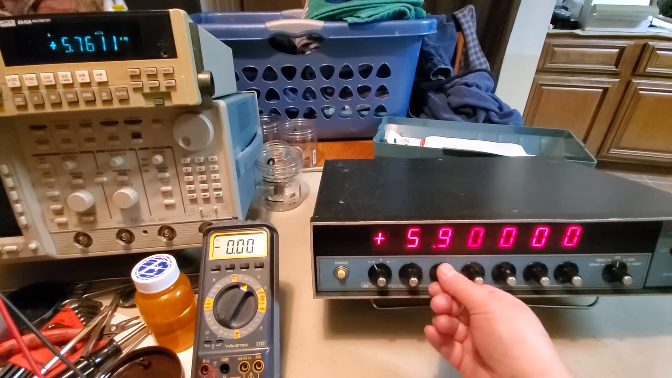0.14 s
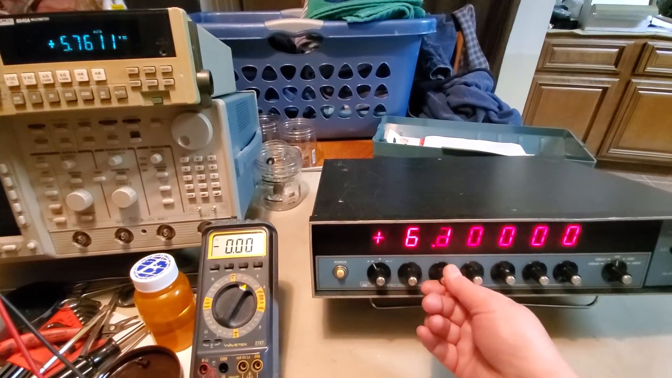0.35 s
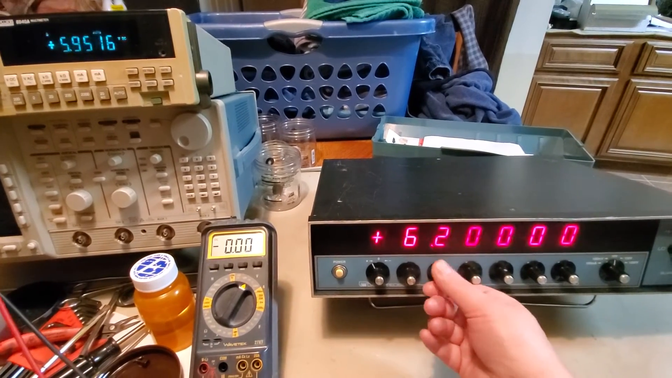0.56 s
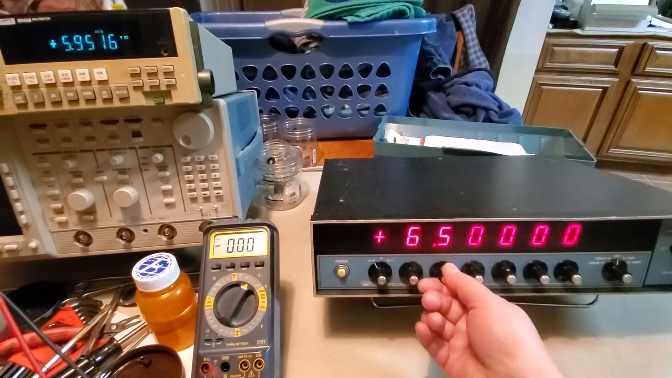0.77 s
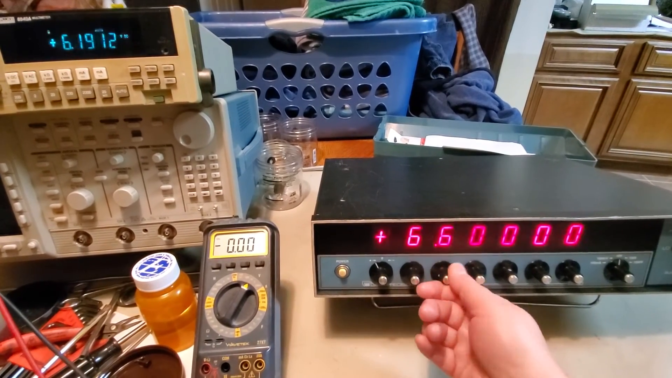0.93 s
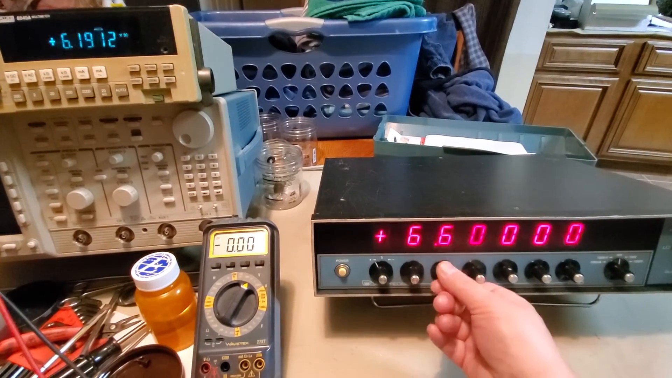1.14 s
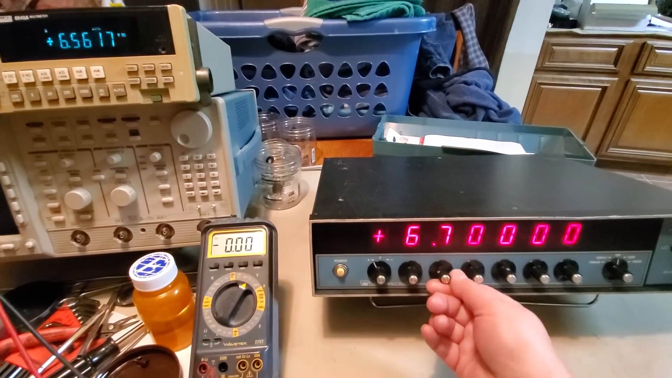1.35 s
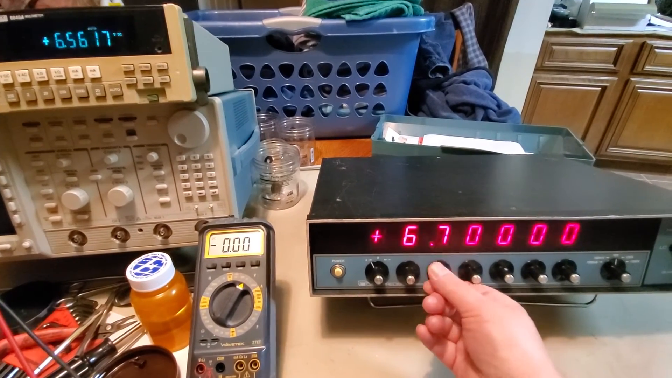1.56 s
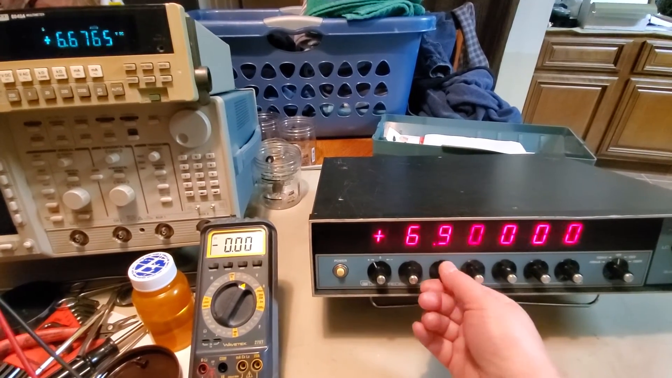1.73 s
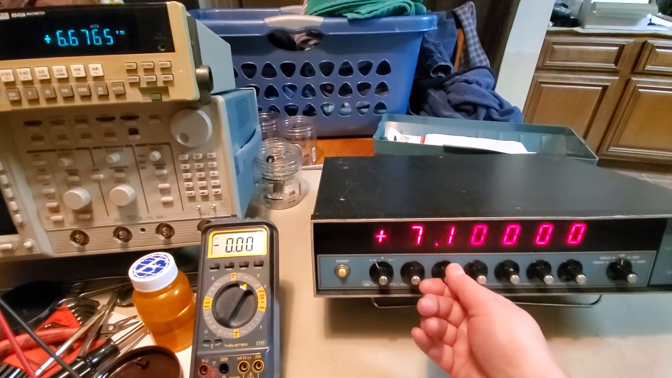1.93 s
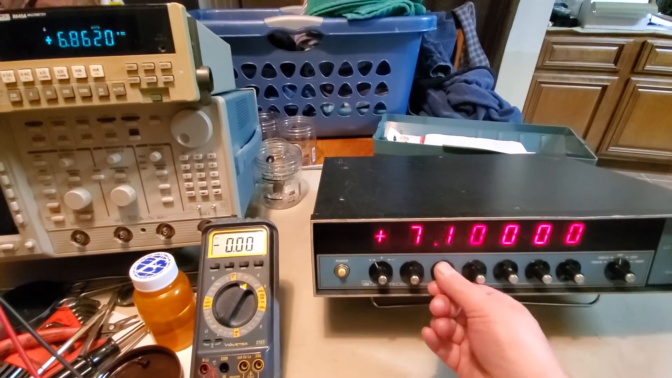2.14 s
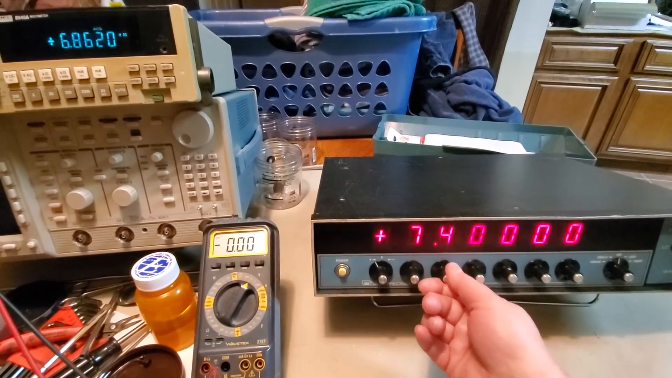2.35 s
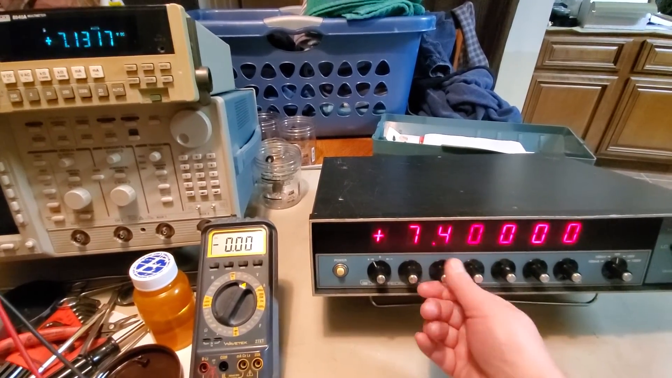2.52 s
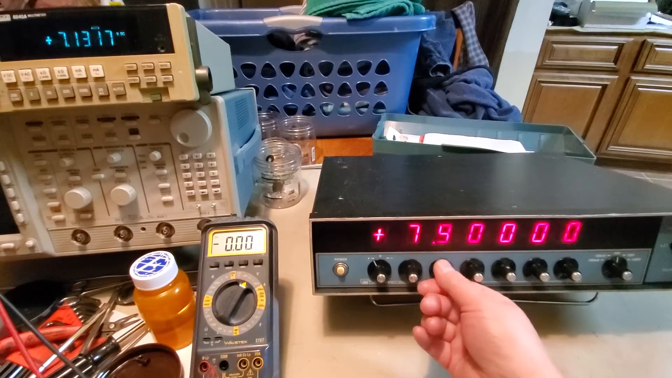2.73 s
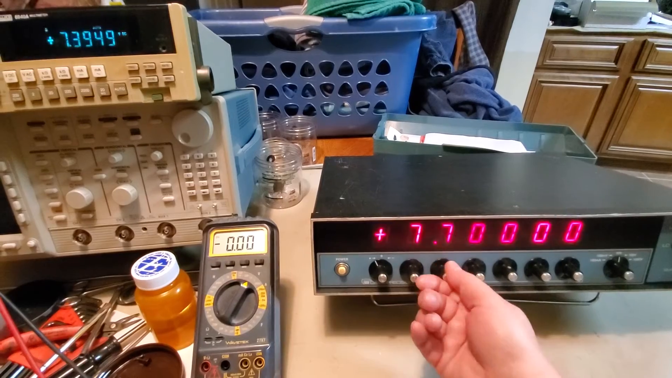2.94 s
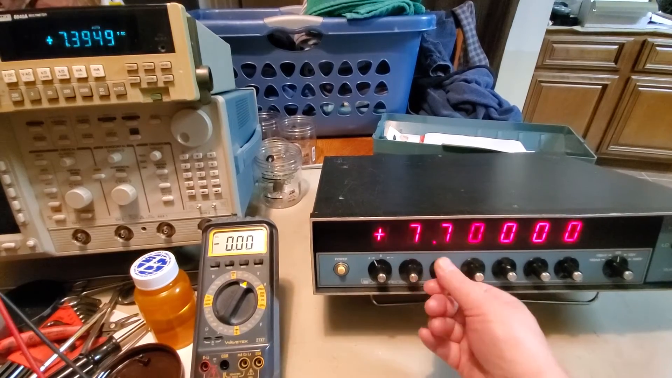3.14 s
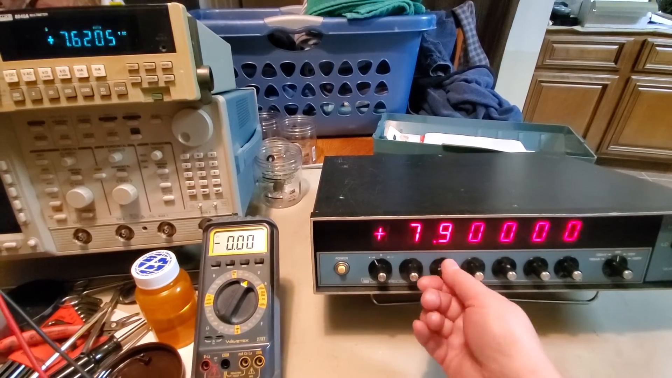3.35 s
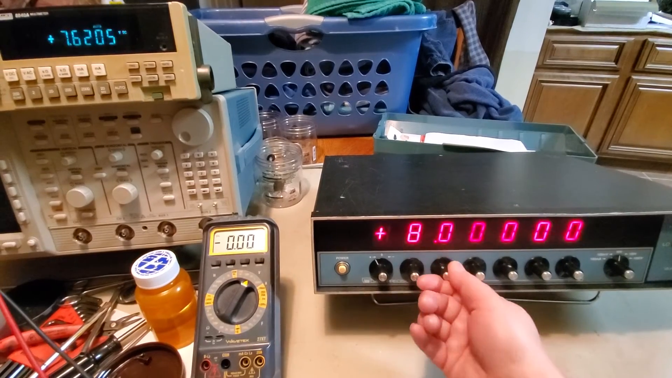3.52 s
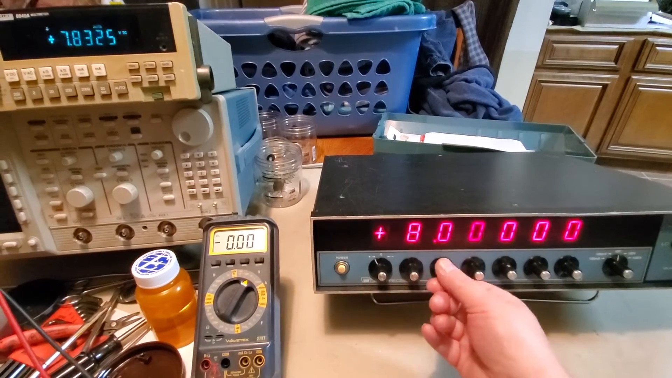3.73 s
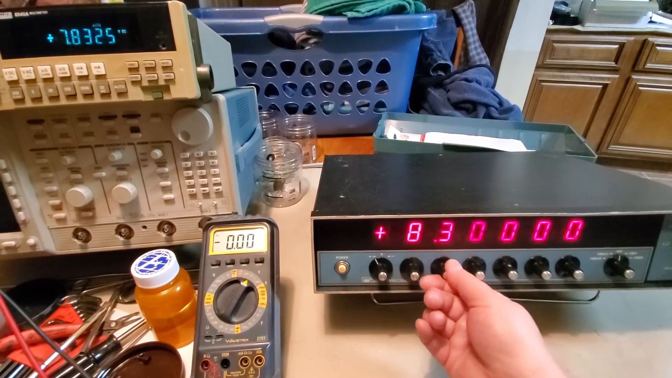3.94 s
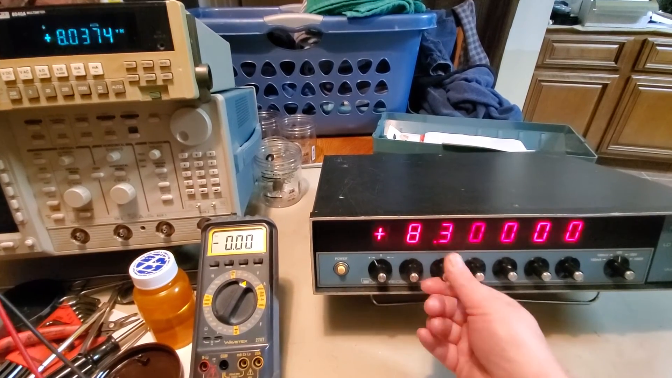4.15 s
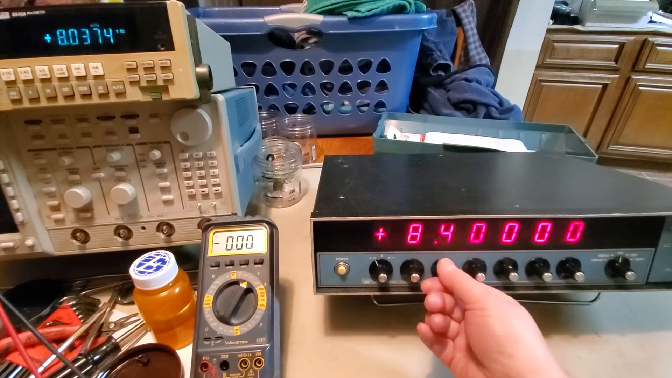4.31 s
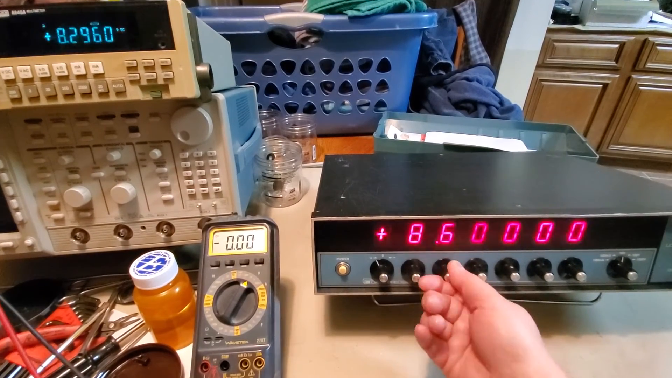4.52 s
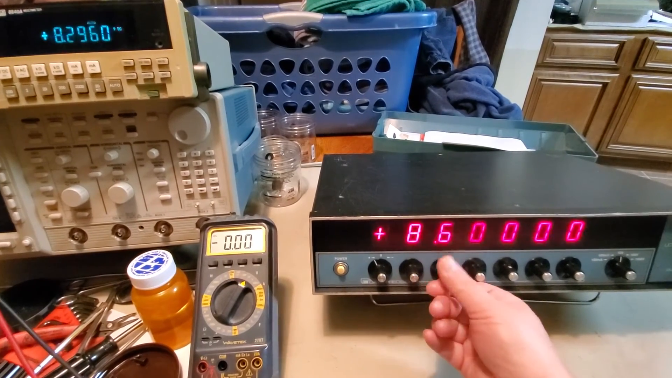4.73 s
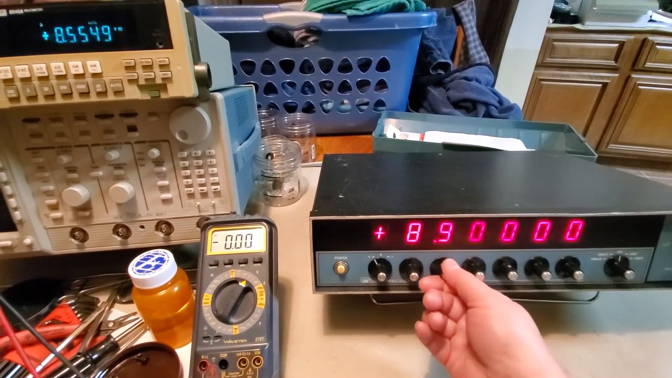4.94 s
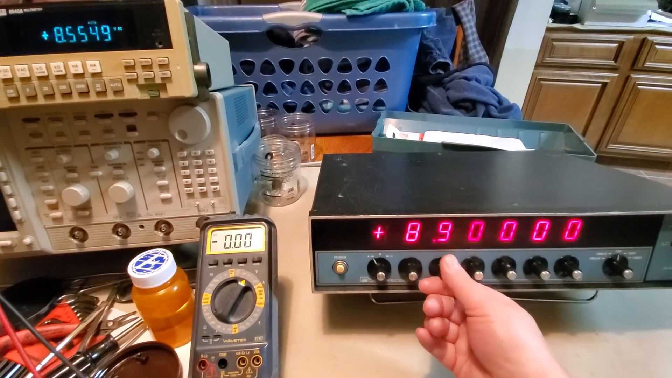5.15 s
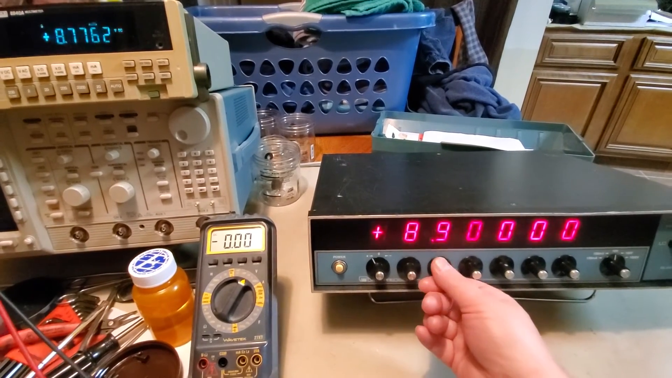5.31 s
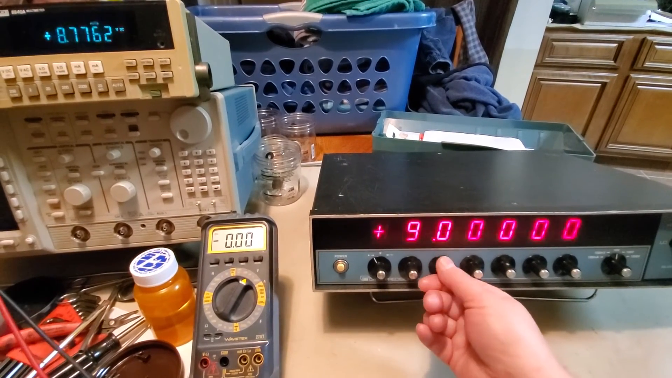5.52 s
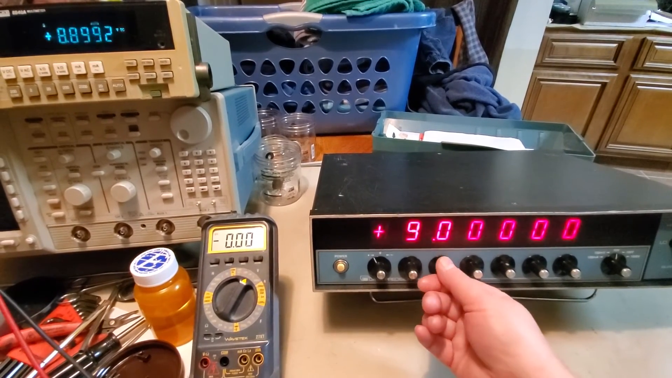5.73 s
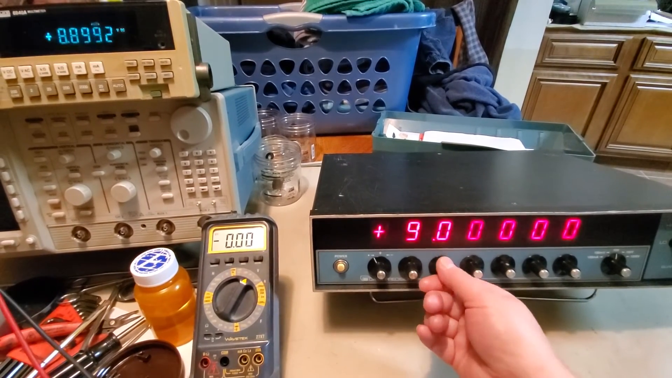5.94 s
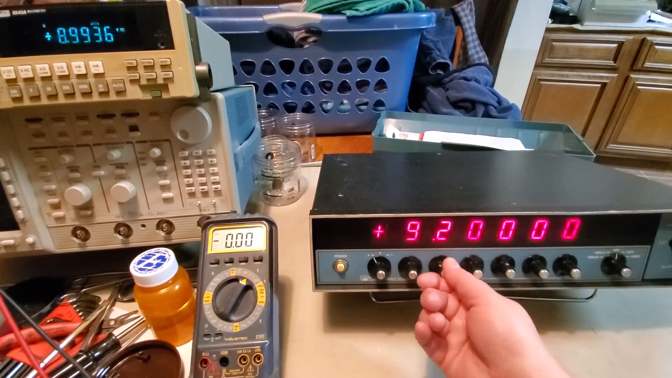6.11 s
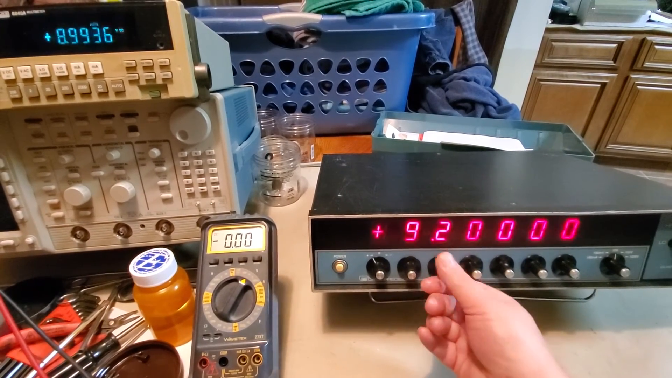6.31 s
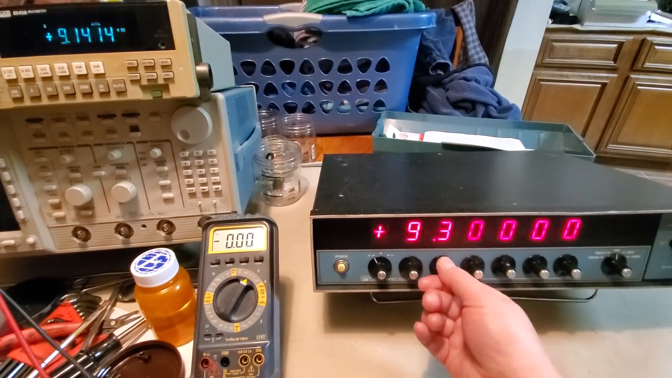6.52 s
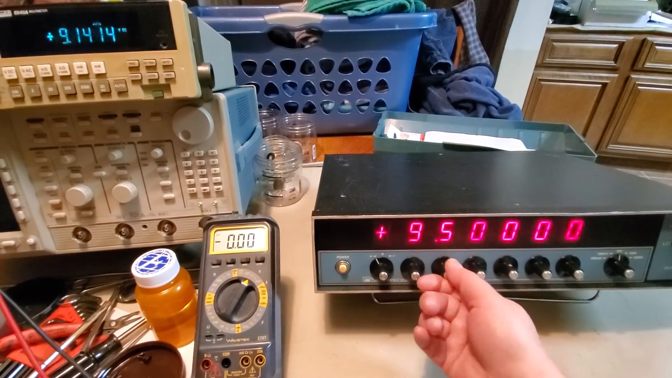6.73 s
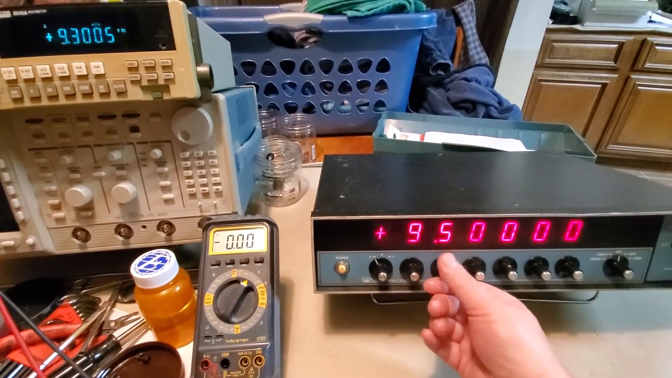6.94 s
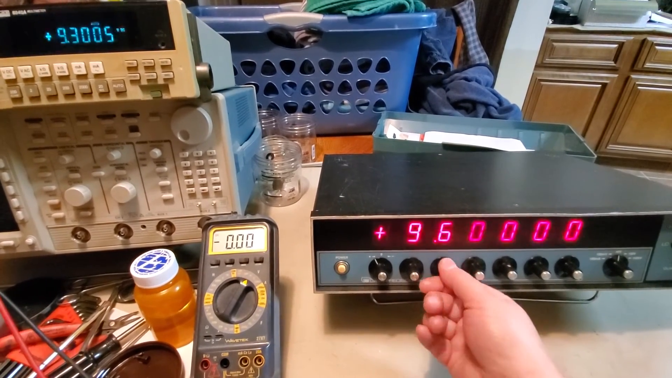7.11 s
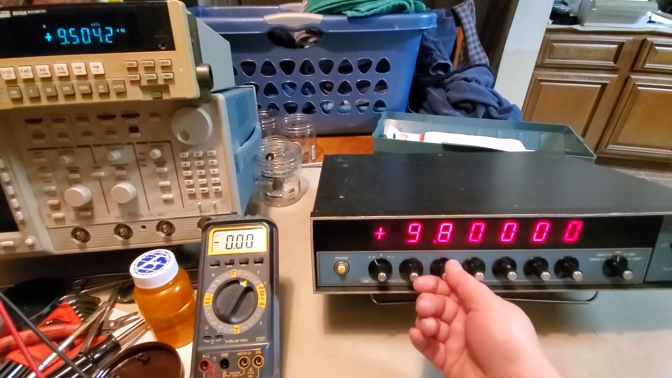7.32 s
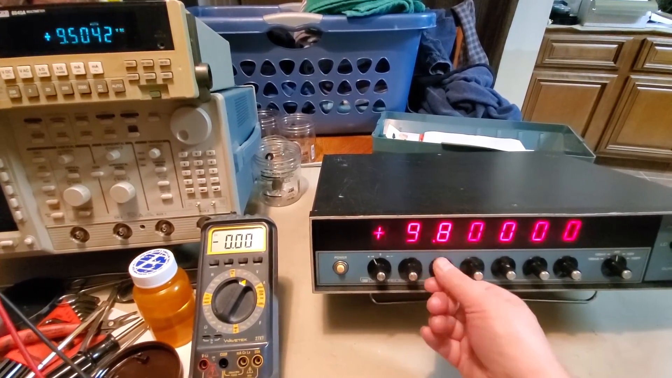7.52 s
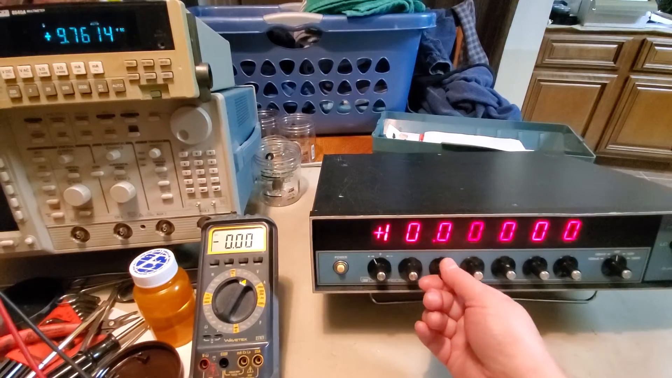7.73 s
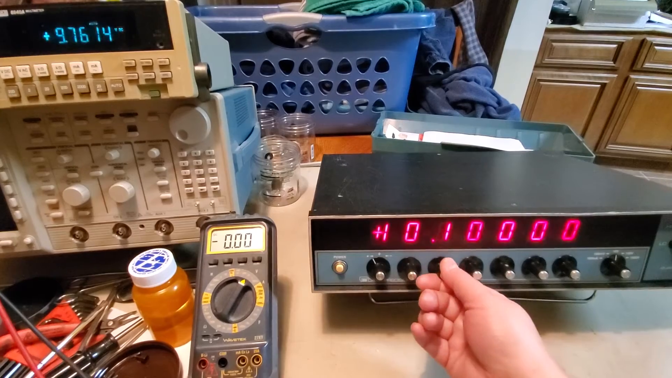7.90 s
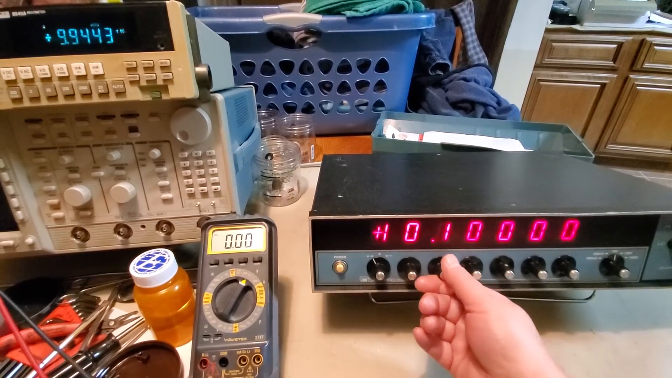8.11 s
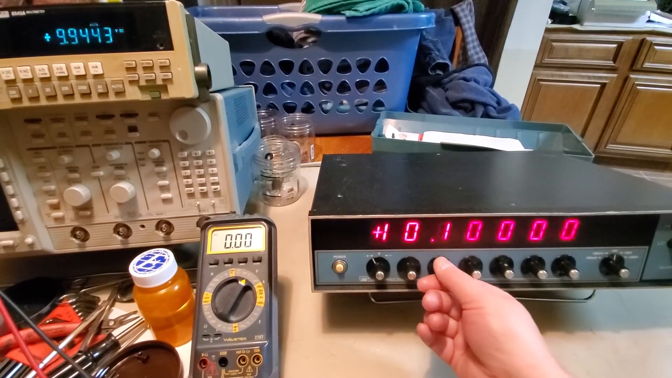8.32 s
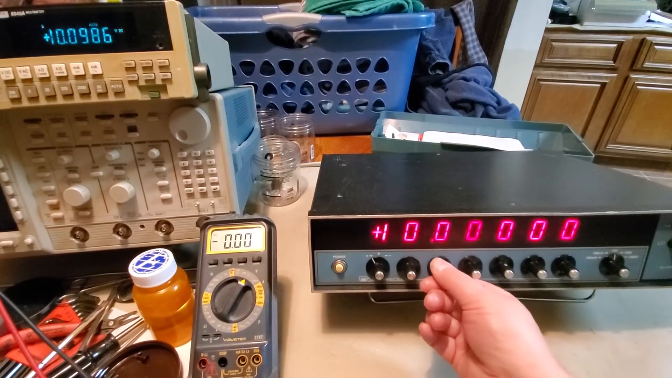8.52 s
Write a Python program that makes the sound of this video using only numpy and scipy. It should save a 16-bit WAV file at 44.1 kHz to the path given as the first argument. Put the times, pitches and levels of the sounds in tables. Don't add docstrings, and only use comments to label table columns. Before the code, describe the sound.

A detented knob is twisted in short bursts of two or three crisp metallic clicks, with faint finger rubbing between, over low wavering household hum.

```python
import sys
import numpy as np
from scipy import signal
from scipy.fft import rfft, irfft, next_fast_len
from scipy.io import wavfile
from scipy.ndimage import map_coordinates

SR = 44100
rng = np.random.default_rng(int(sys.argv[2]) if len(sys.argv) > 2 else 0)


def to_wav(s):
    ch = np.atleast_2d(s).T
    pcm = np.round(np.clip(ch, -1, 1) * 32767)
    wavfile.write(sys.argv[1], SR, pcm.astype(np.int16))


def voltage_ratio(decibels):
    exponent = np.asarray(decibels, float) / 20
    return 10 ** exponent


N = 377580

# start_s, peak_db, low_modes_db, high_modes_db,
# spring_pitch_hz
SNAPS = [(0.2335, -16, -15, -17.5, 5470), (0.3051, -16, -16.5, -17.5, 5400),
         (0.4507, -15.5, -13.5, -15.5, 6300), (0.7405, -16.5, -14, -15, 5800),
         (0.7701, -14, -15, -16, 5740), (0.7994, -12.5, -17.5, -17.5, 3950),
         (0.891, -16.5, -18, -17.5, 6300), (1.258, -15, -15.5, -20, 5600),
         (1.721, -18.5, -12, -18, 5660), (1.7676, -16, -13.5, -16, 5700),
         (1.828, -15.5, -18, -17.5, 5400), (2.243, -15.5, -18.5, -20, 5310),
         (2.2906, -9.5, -16.5, -16.5, 4460), (2.3235, -12, -15.5, -17, 6250),
         (2.3927, -16.5, -17.5, -17.5, 6000), (2.8041, -11, -18.5, -19.5, 6160),
         (2.8749, -15.5, -19.5, -18.5, 4997), (2.9561, -17, -19, -17, 5140),
         (3.3396, -11.5, -14, -19, 6050), (3.3817, -15.5, -11.5, -16, 5240),
         (3.465, -19.5, -18, -17, 4100),
         (3.876, -13.5, -15.5, -21, 4694), (3.917, -14, -19.5, -18, 5340),
              (3.985, -17, -16.5, -17, 5470), (4.3867, -18.5, -14, -14, 4090),
              (4.4225, -15, -16.5, -18, 5730), (4.4799, -17, -16.5, -18, 6400),
              (4.897, -17, -14.5, -18, 5810), (4.931, -14.5, -18.5, -17.5, 6790),
              (4.9763, -15, -18, -18, 5270), (5.596, -15.5, -19.5, -19, 6260),
              (6.037, -19.5, -18.5, -19.5, 5900), (6.1541, -20, -21.5, -20, 4700),
              (6.571, -16, -13.5, -16.5, 4850), (6.6219, -16, -16, -17.5, 5300),
              (6.724, -17, -18, -16.5, 5200), (7.1512, -14.5, -16.5, -17.5, 4570),
              (7.2059, -17.5, -16.5, -16.5, 5510), (7.2928, -17, -15.5, -17, 5180),
              (7.7037, -15, -13, -18, 6540), (7.7663, -12.5, -19.5, -17, 4900),
              (7.8824, -17.5, -22, -20, 6660), (8.5555, -22, -14, -19, 5100)]
# delay_ms, strength_db, ring_length_ratio
BOUNCES = [(5.4, 3, 0.52), (7.3, -5.5, 0.68), (12, -6.5, 0.65), (6, -6, .9), (5.3, -7, 1), (3.9, -3, 0.77),
           (2, 2, 0.67), (3, -2, 0.69), (6, -9.5, 0.83), (3.5, -5.5, .9), (1.9, 0.5, .8), (9.5, -1.5, .9),
           (2, -5, .9), (4.5, -1, 0.61), (1.9, 0.5, 0.66), (5, -4, 0.54), (4.41, -2.5, 0.65),
           (1.3, 2, 0.98), (1.5, -5.5, 1), (14, -6, 0.73), (3.1, -0.5, 1), (3.5, 5.5, 0.56),
           (2.7, 0.5, 0.78), (4.9, -3, 0.81), (4.3, 0.5, 1), (4.9, -4, 0.96), (2.6, 2, 0.88), (5, -2.5, .9),
           (2.9, -1.5, 1), (4.3, -7, 0.77), (2.9, -9, 0.67), (4.35, 0.5, 0.58), (2.81, -7.5, 1),
           (6.1, -1, 0.66), (7.1, -1.5, 0.6), (2.9, -1, 0.88), (7.7, -8.5, 0.97), (2.3, -5.5, 0.9),
           (5.7, 1, 0.57), (6.2, -8.5, 0.82), (4.9, -5.5, 0.85), (4.1, 1, 0.76), (3, -5.5, 0.74)]
# delay_ms, strength_db
SOFT_BOUNCE = (3.1, -6)
# start_s, peak_db, low_modes_db, high_modes_db
TAPS = [(0.711, -37, -4, -27), (0.9844, -58, 4.5, 0), (1.1998, -42, 7, -20), (1.316, -35, 2, -13),
        (1.3283, -33, -4, -15), (1.3372, -31, -13, -31), (2.7262, -52.5, 2, -27), (2.7674, -36.5, -2, -28),
        (3.3022, -56, 12, -6), (3.8137, -42, -1, -7), (4.879, -68, 14, -23), (5.111, -63, 8, -14),
        (5.155, -47.5, -0.5, -24), (5.5055, -57, -2, -2), (5.998, -43, -5, -26), (6.133, -55, -12, -4),
        (6.459, -63.5, -12, 3), (6.4809, -61, 9, -29), (6.4939, -58.5, 17, -6.5), (6.5198, -39.5, -2, -21),
        (7.0983, -44.5, 4.5, -21), (7.646, -55.5, -3, -24), (7.6594, -39, -5.5, -31)]
# start_s, peak_db, low_modes_db, high_modes_db
TICKS = [(0.179, -52, 10, 3), (0.198, -53, 4.5, 0.5), (0.21, -39.5, 2.5, -6.5), (0.3894, -42, -9, -20),
         (0.398, -36, -36, -7), (0.4114, -52, 5.5, -9), (0.4224, -63.5, 8, 17), (0.9291, -44, -6, -14),
         (1.219, -29, -3, -25), (1.941, -41, -29, -5), (1.9795, -37.5, -5, -10), (3.505, -53.5, -22, -4.5),
         (3.5164, -40, -17, -8.5), (1.355, -39, -8, -5), (1.374, -50, -15, -1), (1.449, -50, -15, -8),
         (1.4615, -45.5, -17, -2), (3.8142, -40, -4, -3), (3.3296, -39, -13.5, -23),
         (5.3946, -61, -14.5, -3), (5.441, -56, -12, -5), (5.451, -45, -6, -10), (5.4789, -53, -15, -6),
         (5.4908, -52, -15, -4), (5.52, -56, -9, -19), (7.9892, -50, 3, -16), (8.329, -48, 6, -22.5)]
# firmest_grip_s, rub_swell_db, hiss_swell_db, bench_thump_db
TWISTS = [(.3, 11, 13, 2.5), (.88, 8, 8.5, 5.5), (1.38, 7.5, 7.5, 8), (1.88, 9.5, 7.5, 2.5),
          (2.379, 11.5, 9, 6.5), (2.91, 10, 12, 3), (3.48, 10, 10, 5), (4.0, 9, 11, -2),
          (4.527, 8.5, 9, 14.5), (5.051, 9.5, 6, 7.5), (5.5, 2.5, 3.5, -2), (6.15, 7, 9, 3),
          (6.66, 10, 14, -3.5), (7.28, 9, 14.5, 5), (7.82, 4.5, 12, 1)]
# mode_hz, level_db
CASE_MODES = [(1420, -22), (1820, -19), (2020, -15), (2400, -12), (2730, -12), (2960, -11), (3890, -8),
              (4810, -7), (4930, -6), (5310, -6), (5620, -4), (5910, -5), (6300, -8)]
# freq_hz, density_db_per_hz
SNAP_COLOUR = [(240, -49.5), (400, -27.5), (598, -29), (879, -31), (1630, -21.5), (2430, -13.5),
               (3370, -9.5), (3930, -6.5), (6150, -5), (7630, -12.5), (10500, -14), (16000, -18)]
# freq_hz, t60_s
CASE_T60 = [(1000, 0.23), (2500, 0.099), (5000, 0.039), (8000, 0.027), (15000, 0.047)]
# freq_hz, rise_s
CASE_RISE = [(500, 0.012), (1000, 0.004), (2500, 0.0002), (5000, 0.00057), (15000, 0.00071)]
# freq_hz, level_db
BOUNCE_COLOUR = [(1000, -3.5), (5000, -6), (12000, -1)]
# freq_hz, spread_db
CHATTER = [(1000, 1), (5000, 1.6), (12000, 3)]
# freq_hz, level_db
SPARK = [(1000, -20), (3000, -6), (6000, -3), (12000, 5)]
# mode_hz, level_db, t60_s
THUMP_MODES = [(210.7, 1, 0.09), (251.8, 2, 0.11), (303, -6, 0.059), (497, -4, 0.042)]
# freq_hz, lag_rad
LEFT_LAG = [(700, .9), (1400, 1.1), (2760, 2.1), (4100, 3), (4800, 3.5), (5600, 5.7), (7600, 7.2),
            (14000, 8.8)]
# start_s, level_db, pitch_hz
PLINKS = [
    (0.934, -43.5, 1050),
    (0.982, -41, 1810),
    (7.853, -49, 1730),
    (8.325, -51.5, 1920),
]
# freq_hz, density_db_per_hz
SKIN = [(290, -36), (500, -7.5), (547, -6.5), (823, -8), (908, -12.5), (1210, -4.5), (1300, -7.5),
        (1970, -5.5), (4200, -18), (5460, -49), (9240, -120)]
# freq_hz, density_db_per_hz
RUSTLE = [(5000, -40), (7000, -4), (8500, 0.5), (10500, -3), (13000, -2), (16000, -9.5)]
# freq_hz, density_db_per_hz
HISS = [(2600, -35.5), (3300, -30.5), (4560, -4), (5630, -11), (7000, -9.5), (8000, -19.5), (10000, -17),
        (12500, -13), (14500, -16.5), (16000, -19.5)]
# freq_hz, density_db_per_hz
WHINE = [(11500, -120), (12000, -7), (12450, -5), (12900, -14), (13400, -120)]
# start_s, level_db
BUMPS = [
    (1.245, -38.5),
    (1.267, -31),
    (1.318, -40),
    (1.3285, -27.5),
    (1.3377, -24.5),
    (1.344, -28.5),
    (.25, -47),
    (.94, -47),
    (6.487, -47),
]
# mode_hz, level_db, t60_s
BENCH_MODES = [(126.2, -20.5, 0.35), (173.6, -16.5, 0.26), (213.6, -16, 0.28), (282.2, -1, 0.11),
               (352, -21, 0.57), (464, 2.5, 0.029), (562.4, -22, 0.094), (723, -20.5, 0.09)]
# freq_hz, t60_s
ROOM_T60 = [(200, 0.22), (2000, 0.22), (6000, 0.22), (15000, 0.2)]
# freq_hz, level_db
ECHO_COLOUR = [(1000, -4.5), (3000, -12.5), (5500, -22), (8000, -12), (15000, -17)]
# time_s, level_db
DRONE = [(0, -51), (0.1, -47), (2.5, -50.5), (2.69, -62), (2.98, -49), (3.3, -57.5), (3.8, -72.5),
         (4.45, -58), (4.86, -73.5), (4.96, -48), (5.2, -66), (5.7, -53), (5.85, -66), (7.9, -58),
         (8.56, -72)]
# time_s, pitch_hz, level_db
MOTOR = [(0, 47.3, -53), (0.5, 47.1, -53), (1.07, 45.4, -59), (1.7, 46.7, -59), (2.1, 58, -70),
         (2.3, 56.5, -51.5), (3.72, 55.5, -55.5), (4.96, 55, -60.5), (5.31, 41.65, -47.5),
         (6.25, 42.2, -56.5), (6.41, 39.9, -63), (6.67, 41.1, -50.5), (7.46, 40.2, -65),
         (7.77, 54.2, -65.5), (8.56, 51.5, -68)]
# time_s, pitch_hz, level_db
TRUCK = [
    (7.6, 117.6, -68),
    (7.714, 116.7, -76),
    (7.85, 134.4, -71),
    (8.03, 143.3, -64.5),
    (8.3, 152, -68),
    (8.56, 162.7, -65),
]
# pitch_hz, level_db
MAINS = [(99, -71.5), (113, -71)]
# pitch_hz, level_db
FAN = [(560, -80), (807.5, -84), (1023, -84)]
# time_s, level_db
HUM_LEVEL = [(0, -58), (1, -58), (2, -57.5), (3, -57.5), (4, -58.5), (4.8, -61), (5.1, -57.5), (5.9, -60),
             (6.7, -60), (7.5, -60), (8.56, -65)]
# freq_hz, density_db_per_hz
HUM = [(18, -23.5), (30, -7), (48, -6.5), (91, -6), (108, -5.5), (156, -14.5), (185, -20), (243, -7.5),
       (268, -16), (297, -16), (347, -22.5), (372, -26.5), (436, -26.5), (658, -41), (900, -37),
       (1170, -58.5), (1980, -120)]
# freq_hz, correlation
ALIKE = [(60, 0.89), (180, 0.99), (550, 0.66), (1650, -0.18), (4970, -0.019), (15000, 0.55)]
# freq_hz, left_over_right_db
PORT_LEAN = [(60, 0), (110, -0.9), (200, 0.5), (380, -2.5), (700, 0.4), (1290, 1.5), (2380, 7.5),
             (4400, 8.5), (8120, -1), (15000, 6)]

TAP_HZ, TAP_RING_RATIO, TICK_RING_RATIO = 1620, 0.38, 0.27
SNAP_ECHO_DB, TAP_ECHO_DB = -1.5, -3
SPARK_T60_S = 0.007
TAIL_PEAK_DB, TAIL_WIDTH_HZ = 1, 60
PLINK_T60_S, PLINK_RISE_S = 0.032, 0.0011
RUB_PRESS_S, RUB_RELEASE_S = 0.27, 0.21
HISS_PRESS_S, HISS_RELEASE_S = 0.25, 0.35
RUB_REST_DB, HISS_REST_DB, WHINE_DB = -68, -77, -85
RUB_FADE_DB, HISS_FADE_DB = -1.5, -4.5
RUSTLE_DB, RUSTLE_SWELL_RATIO = -92.5, 1.9
DRONE_HZ = 81.6


def unit(x):
    return x / np.sqrt(np.mean(x ** 2) + 1e-20)


def along(points, hz):
    f, v = np.transpose(points)
    return np.interp(np.log(hz + 1), np.log(f + 1), v)


def curves(rows):
    s, *cols = np.transpose(rows)
    return [np.interp(np.arange(N) / SR, s, c) for c in cols]


def wobble(rate_hz):
    knots = rng.standard_normal(int(N * rate_hz / SR) + 4)
    return map_coordinates(knots, [np.arange(N) * rate_hz / SR])


def filtered(x, response):
    m = next_fast_len(N + SR // 2)
    return irfft(rfft(x, m) * response(np.fft.rfftfreq(m, 1 / SR)), m)[..., :N]


def rush(spectrum):
    def mid_side(hz):
        turn = np.arccos(np.clip(along(ALIKE, hz), -1, 1)) / 2
        return voltage_ratio(along(spectrum, hz)) * [np.cos(turn), np.sin(turn)]
    mid, side = filtered(rng.standard_normal((2, N)), mid_side)
    return unit(np.array([mid + side, mid - side]))


def ringing(hz, gain, t60, rise, t):
    hz, gain, t60, rise = (np.asarray(v)[:, None] for v in (hz, gain, t60, rise))
    envelope = gain * voltage_ratio(-60 * t / t60) * (1 - np.exp(-(t / rise) ** 2))
    return np.sum(envelope * np.sin(2 * np.pi * hz * t), axis=0)


def bands(white, hz, centres):
    shares = np.array([along(np.c_[centres, one], hz) for one in np.eye(len(centres))])
    return irfft(white[..., None, :] * shares)


def tone(hz, db, waver_hz, waver_db):
    phase = 2 * np.pi * np.cumsum(hz + waver_hz * wobble(6)) / SR
    return np.sqrt(2) * voltage_ratio(db + waver_db * wobble(12)) * np.sin(phase)


def knob():
    t = np.arange(SR // 3) / SR
    low_hz, low_db, low_t60 = np.transpose(THUMP_MODES)
    twist_s, *_, thump_db = np.transpose(TWISTS)
    bright, dull = np.zeros((2, N + SR)), np.zeros(N + SR)
    snaps = [(*row, *bounce, SNAP_ECHO_DB) for row, bounce in zip(SNAPS, BOUNCES)]
    taps = [(*row, TAP_HZ, *SOFT_BOUNCE, TAP_RING_RATIO, TAP_ECHO_DB) for row in TAPS]
    for s, db, *shape in snaps + taps:
        start = round(s * SR)
        bright[:, start:start + len(t)] += snap(db, *shape, t)
        push_db = low_db + np.interp(s, twist_s, thump_db) + 2.1 * rng.standard_normal(len(low_hz))
        thump = ringing(low_hz, voltage_ratio(push_db), low_t60, low_hz * 0 + 0.0068, t)
        dull[start:start + len(t)] += voltage_ratio(db - 31.5) * thump
    for s, db, low_db_rel, high_db_rel in TICKS:
        start = round(s * SR)
        bright[:, start:start + len(t)] += snap(db - 8.5, low_db_rel, high_db_rel, 5000, *SOFT_BOUNCE,
                                                TICK_RING_RATIO, TAP_ECHO_DB, t)
    lag = [(0.0023, 0.0097)] + LEFT_LAG
    late = lambda hz: np.exp(-1j * along(lag, hz) * np.array([[1], [0]]))
    return filtered(bright[:, :N], late), dull[:N]


def snap(db, low_db, high_db, spring_hz, bounce_ms, bounce_db, ring_ratio, echo_db, t):
    hz, centres = np.fft.rfftfreq(len(t), 1 / SR), np.geomspace(500, 15000, num=10)
    tilt_points = [(500, 0.011), (1200, low_db + 18), (2600, low_db + 18),
                   (3600, 0.014), (6800, 0.0031), (8000, high_db + 18)]

    def tilt_db(f):
        spring = 5 * np.exp(-((f - spring_hz) / 450) ** 2)
        return spring + along(tilt_points, f)

    colour = voltage_ratio(along(SNAP_COLOUR, hz) + tilt_db(hz))
    mode_hz, mode_db = np.transpose(CASE_MODES)
    mode_hz = mode_hz * (1 + 0.0029 * rng.standard_normal(len(mode_hz)))
    chatter = map_coordinates(rng.standard_normal(len(t)), [t * 900])
    sound = rattle(colour, hz, centres, chatter, bounce_ms, bounce_db, ring_ratio, t)
    sound = sound + snap_echo(colour, hz, centres, mode_hz, chatter, echo_db, t)
    sound = sound + case_modes(mode_hz, mode_db + np.minimum(tilt_db(mode_hz), 5), ring_ratio, t)
    return voltage_ratio(db + 3.5) * sound


def rattle(colour, hz, centres, chatter, bounce_ms, bounce_db, ring_ratio, t):
    rise = along(CASE_RISE, centres)[:, None]
    t60 = along(CASE_T60, centres)[:, None] * ring_ratio
    spark_db = along(SPARK, centres)[:, None]

    def blow(t):
        decay = voltage_ratio(-60 * t / t60) + voltage_ratio(spark_db - 60 * t / SPARK_T60_S)
        return decay * (1 - np.exp(-(t / rise) ** 2))

    bounce_gain = voltage_ratio(bounce_db + along(BOUNCE_COLOUR, centres)[:, None])
    bounce = bounce_gain * blow(np.maximum(t - bounce_ms / 1000, 0))
    body = voltage_ratio(along(CHATTER, centres)[:, None] * chatter) * np.hypot(blow(t), bounce)
    shared, left, right = bands(rfft(rng.standard_normal((3, len(t)))) * colour, hz, centres)
    apart = 0.45
    noise = np.sqrt(1 - apart) * shared + np.sqrt(apart) * np.array([left, right])
    return np.sum(body * noise, axis=1)


def snap_echo(colour, hz, centres, mode_hz, chatter, echo_db, t):
    humps = np.exp(-((hz - mode_hz[:, None]) / TAIL_WIDTH_HZ) ** 2)
    peaks = 1 + voltage_ratio(TAIL_PEAK_DB + 4.1 * rng.standard_normal(len(mode_hz))) @ humps
    far = bands(rfft(rng.standard_normal((2, len(t)))) * colour * peaks, hz, centres)
    decay_db = -60 * t / along(ROOM_T60, centres)[:, None]
    tail = voltage_ratio(echo_db + along(ECHO_COLOUR, centres)[:, None] + decay_db) * (1 - np.exp(-t / 0.0026))
    uneven_db = np.interp(t / 9, t, chatter)
    return np.sum(tail * far, axis=1) * voltage_ratio(uneven_db)


def case_modes(mode_hz, level_db, ring_ratio, t):
    strength = voltage_ratio(level_db - 15 + 3.4 * rng.standard_normal(len(mode_hz)))
    strength = strength * rng.choice([-1, 1], len(mode_hz))
    t60 = along(CASE_T60, mode_hz) * ring_ratio * 0.69
    return ringing(mode_hz, strength, t60, along(CASE_RISE, mode_hz), t)


def nail():
    out, t = np.zeros(N + SR), np.arange(SR // 10) / SR
    for s, db, hz in PLINKS:
        plink = ringing([hz], [voltage_ratio(db)], [PLINK_T60_S], [PLINK_RISE_S], t)
        out[round(s * SR):][:len(t)] += plink
    return out[:N]


def grip_db(press_s, release_s, swell_db):
    t = np.arange(N) / SR
    swells = [np.interp(t, [row[0] - press_s, row[0], row[0] + release_s], [0, db, 0])
              for row, db in zip(TWISTS, swell_db)]
    return np.max(swells, axis=0)


def fingers_and_hiss():
    _, rub_swell, hiss_swell, _ = np.transpose(TWISTS)
    later = np.arange(N) / N
    grip = grip_db(RUB_PRESS_S, RUB_RELEASE_S, rub_swell)
    linger = grip_db(HISS_PRESS_S, HISS_RELEASE_S, hiss_swell)
    rub_db = RUB_REST_DB + RUB_FADE_DB * later + grip + 3.5 + wobble(25)
    rub_db = rub_db + 0.58 * np.array([wobble(300), wobble(280)])
    rustle_db = RUSTLE_DB + RUSTLE_SWELL_RATIO * linger + 1.7 * wobble(9) + 1.7 * wobble(60)
    hiss_db = HISS_REST_DB + HISS_FADE_DB * later + linger + 4.0 + 0.72 * wobble(40) + 0.98 * wobble(15)
    whine_db = WHINE_DB + 4.0 * wobble(5) + 1.5 * wobble(30)
    skin = voltage_ratio(rub_db) * rush(SKIN) + voltage_ratio(rustle_db) * rush(RUSTLE)
    return skin + voltage_ratio(hiss_db) * rush(HISS) + voltage_ratio(whine_db) * rush(WHINE)


def bench():
    out, t = np.zeros(N + SR), np.arange(SR // 3) / SR
    hz, level_db, t60 = np.transpose(BENCH_MODES)
    rough = signal.butter(2, [500, 2600], "band", fs=SR)
    for s, db in BUMPS:
        gain = voltage_ratio(level_db + 1.5 * rng.standard_normal(len(hz)))
        knock = ringing(hz, gain, t60, hz * 0 + 0.0016, t)
        scuff = unit(signal.lfilter(*rough, rng.standard_normal(len(t))))
        scuff = scuff * voltage_ratio(-8.5 - 60 * t / 0.057) * (1 - np.exp(-t / 0.00053))
        out[round(s * SR):][:len(t)] += voltage_ratio(db) * (knock / np.abs(knock).max() + scuff)
    return out[:N]


def room(x):
    hz, t, z = signal.stft(rng.standard_normal((2, SR // 2)), SR, nperseg=256)
    tail = signal.istft(z * voltage_ratio(-60 * t / along(ROOM_T60, hz)[:, None]), SR, nperseg=256)[1]
    delayed = np.pad(x, (300, 0))[None]
    return signal.fftconvolve(delayed, tail / np.linalg.norm(tail[0]), axes=1)[:, :N]


def machinery():
    (drone_db,), (hum_db,) = curves(DRONE), curves(HUM_LEVEL)
    lines = tone(DRONE_HZ, drone_db, 0.6, 1.2) + tone(2 * DRONE_HZ, drone_db - 14, 3, 2.5)
    lines += tone(*curves(MOTOR), 0.5, 1.5)
    lines += sum(tone(hz, db, 0.7, 2.5) for hz, db in MAINS)
    lines += sum(tone(hz, db, 0.8, 1.5) for hz, db in FAN)
    truck_fade = np.clip((np.arange(N) / SR - TRUCK[0][0]) / 0.17, 0, 1)
    lines += tone(*curves(TRUCK), 0.55, 1.7) * truck_fade
    lines += tone(243, hum_db - 6.0, 1.13, 1.6)
    return lines + voltage_ratio(hum_db + 5.5) * rush(HUM)


def scene():
    bright, dull = knob()
    low = dull + bench()
    echo = room(low)
    low_echo = voltage_ratio(-7.0) * (echo[0] + 0.18 * echo * [[0], [1]])
    return bright + nail() + low + low_echo + machinery() + fingers_and_hiss()


def low_pass(x):
    return signal.sosfilt(signal.butter(12, 16810, fs=SR, output="sos"), x)


def record(dry):
    def ports(hz):
        top = voltage_ratio(along([(15700, -0.5), (16000, -26.5), (17000, -43)], hz))
        bass = 1 / np.sqrt(1 + (36 / (hz + 1)) ** 8)
        return voltage_ratio(along(PORT_LEAN, hz) * np.array([[0.5], [-0.5]])) * top * bass
    rounded = dry / (1 + np.abs(dry / 0.45) ** 4) ** 0.25
    return low_pass(filtered(rounded, ports))


dry = scene()
out = record(dry)
to_wav(out)
```